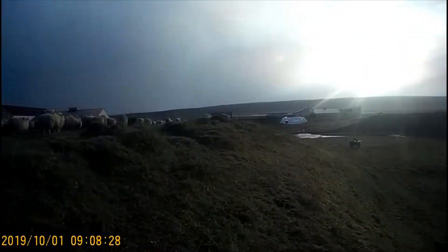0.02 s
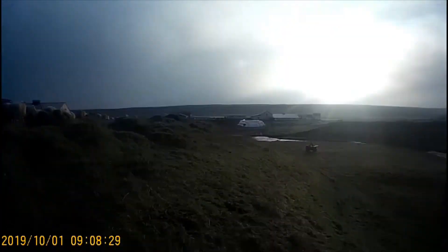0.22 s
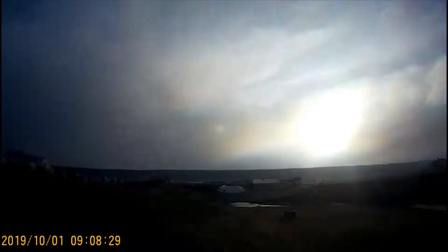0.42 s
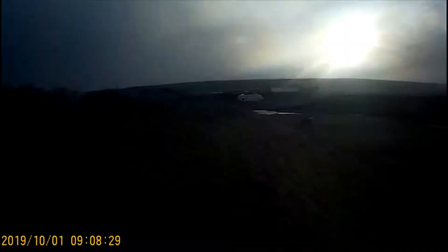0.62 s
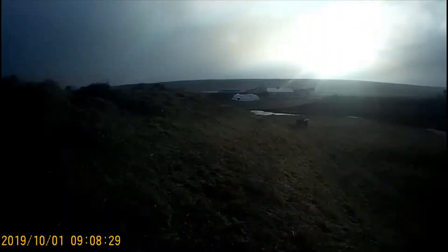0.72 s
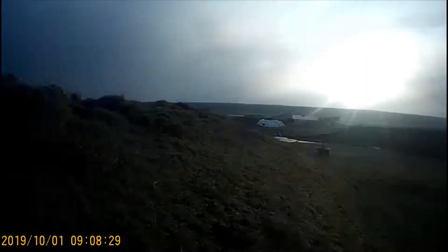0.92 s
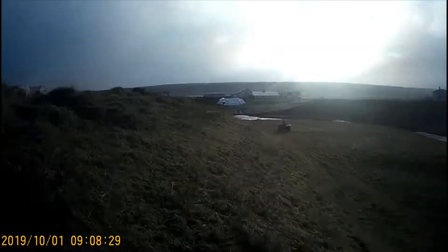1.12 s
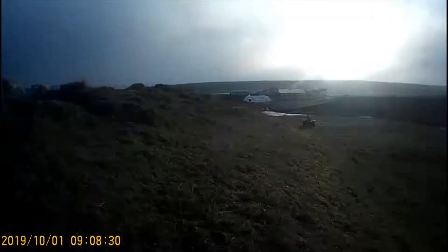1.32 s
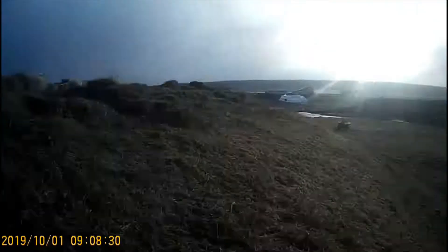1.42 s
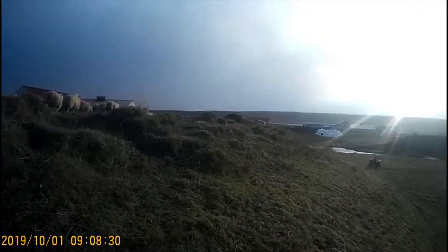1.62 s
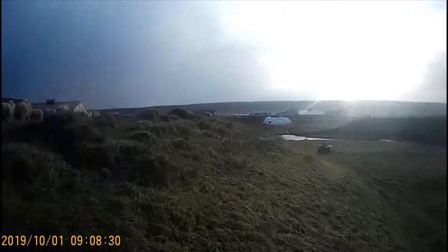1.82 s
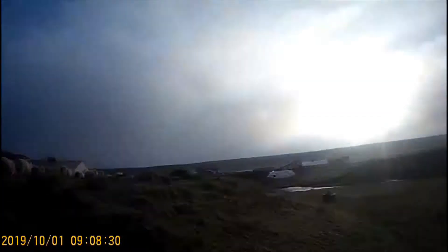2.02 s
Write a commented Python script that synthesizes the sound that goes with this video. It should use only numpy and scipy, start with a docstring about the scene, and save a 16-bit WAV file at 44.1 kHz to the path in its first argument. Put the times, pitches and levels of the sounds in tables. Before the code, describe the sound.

Brisk footsteps crunch through rough grass on open ground, five uneven footfalls with dull thuds, legs swishing between them, a boxy body-worn camera knocking on its mount and wind buffeting its microphone in low surges.

```python
"""Brisk footsteps through rough grass, heard from a small camera carried on the body.
Each footfall is a burst of tiny stalk fractures, with a low rub and a thud just after it.
Between footfalls the legs swish through the grass, a few stalks snap and the camera knocks on its mount.
The boxy camera case colours the grass; wind buffets the port as a surging rumble over a faint hiss."""
import sys
import numpy as np
from scipy import signal
from scipy.fft import rfft, irfft
from scipy.io import wavfile
from scipy.ndimage import uniform_filter1d

SR = 44100
rng = np.random.default_rng(int(sys.argv[2]) if len(sys.argv) > 2 else 0)


def wrap_up_sound(samples):
    """Save the sound to the file named by the first command line argument, as 16-bit audio."""
    columns = np.atleast_2d(samples).T
    # keep every value between -1 and 1, then stretch to whole-number steps
    tamed = np.clip(columns, -1, 1)
    steps = np.round(tamed * 32767).astype(np.int16)
    wavfile.write(sys.argv[1], SR, steps)


N = 92610
TIME = np.arange(N) / SR  # seconds

# Starting balance of the grass against its middle band; the tables add to these.
LOW_DB, TREBLE_DB = -4.5, -16


def from_db(db):
    """Turn decibels into gain."""
    return 10 ** (np.asarray(db) / 20)


def rms_one(x):
    """Scale to an rms (average strength) of 1."""
    return x / np.sqrt(np.mean(x ** 2) + 1e-20)


def coloured(x, spectrum):
    """Filter to the given spectrum, each sound starting at once (minimum phase); rms 1."""
    hz, db = np.transpose(spectrum)
    grid = np.maximum(np.arange(N + 1) * SR / (2 * N), 1)
    gain = from_db(np.interp(np.log(grid), np.log(hz), db))
    # Folding the cepstrum forward in time gives the minimum phase.
    cepstrum = irfft(np.log(gain))
    cepstrum[1:N] *= 2
    cepstrum[N + 1:] = 0
    response = np.exp(rfft(cepstrum))
    # The input is repeated to fill the filter's length of 2 N.
    filtered = irfft(rfft(np.tile(x, 2)) * response)
    return rms_one(filtered[:N])


def evened(x, window_s):
    """Take the slow swings out of a noise, leaving its fine grain; rms 1."""
    instant_power = np.abs(signal.hilbert(x)) ** 2
    power = uniform_filter1d(instant_power, max(int(window_s * SR), 1))
    return rms_one(x / np.sqrt(power + 1e-6))


def noise(spectrum):
    """Steady random noise of the given colour; rms 1."""
    return coloured(rng.standard_normal(N), spectrum)


def swell(start, end, rise, fall):
    """Rise, hold at 1 and fall; rise and fall are the seconds taken to change by 20 dB."""
    before = np.maximum(start - TIME, 0)
    after = np.maximum(TIME - end, 0)
    return from_db(-20 * (before / rise + after / fall))


def level_curve(points):
    """Gain over time, drawn in straight lines of decibels between the points."""
    return from_db(np.interp(TIME, *np.transpose(points)))


# Colour of the hiss: pitch_hz [Hz], level_db [dB per Hz]
HISS_COLOUR = [(100, 0.32), (4000, -1.5), (7000, -0.78), (15000, -0.65)]


def hiss():
    """The microphone's own faint, steady noise."""
    hiss_db = -68.5
    return from_db(hiss_db) * noise(HISS_COLOUR)


# Colour of the wind: pitch_hz [Hz], level_db [dB per Hz]
WIND_COLOUR = [(8, 1.5), (18, 11.5), (30, -1), (48, -8.5), (65, -20), (85, -13), (130, -17), (200, -20.5),
               (400, -45), (1000, -81), (4000, -110)]
# Wind buffeting the port: peak_s [s], rise_s [s per 20 dB], fall_s [s per 20 dB], level_db [dB]
WIND_GUSTS = [(.28, 0.07, 0.14, -22), (.42, 0.24, .16, -24.5), (.68, 0.049, 0.047, -11),
              (.755, 0.14, 0.11, -10), (0.991, 0.07, 0.1, -12.5), (1.055, 0.05, 0.058, -15),
              (1.376, 0.034, 0.017, -14), (1.451, 0.054, 0.055, -14.5), (1.772, 0.042, 0.081, -16),
              (1.83, 0.051, 0.047, -17)]


def wind():
    """Lumpy low rumble of air at the port, surging with the strides over a steady breeze."""
    breeze_db = -36
    power = from_db(breeze_db) ** 2
    for peak_s, rise_s, fall_s, level_db in WIND_GUSTS:
        gust = from_db(level_db) * swell(peak_s, peak_s, rise_s, fall_s)
        power = power + gust ** 2
    return np.sqrt(power) * evened(noise(WIND_COLOUR), window_s=0.032)


# Colour of a snapping stalk: pitch_hz [Hz], level_db [dB per Hz]
SNAP_COLOUR = [(1500, -17.5), (4500, -2.5), (7000, -13), (15000, -14)]
# Dry stalks snapping: peak_s [s], level_db [dB]
STALK_SNAPS = [(0.427, -46.5), (0.541, -53), (1.829, -56.5)]


def snaps():
    """Single dry stalks break, each a thin tick of bright noise."""
    rise_s, fall_s = 0.002, 0.02  # per 20 dB
    level = np.zeros(N)
    for peak_s, level_db in STALK_SNAPS:
        level += from_db(level_db) * swell(peak_s, peak_s, rise_s, fall_s)
    return level * noise(SNAP_COLOUR)


# Grass as heard through the case, in three bands: pitch_hz [Hz], level_db [dB per Hz]
GRASS_LOW_COLOUR = [(90, -24), (135, 5), (185, -1.5), (235, -6.5), (292, 9.5), (330, 1), (365, 2.5),
                    (420, -7.5), (485, -5), (560, -7), (640, -8.5), (755, -1.5), (870, -12.5), (1100, -14),
                    (4000, -80)]
GRASS_MIDDLE_COLOUR = [(400, -33), (880, -18.5), (995, -13.5), (1065, -8.5), (1160, 3), (1245, 4),
                       (1340, 1.5), (1480, -4), (1800, -4), (2020, -5), (2250, -19), (2600, -35.5),
                       (4000, -85), (8000, -80.5)]
GRASS_TREBLE_COLOUR = [(1700, -2), (2400, -7), (2800, 1.5), (3600, 2), (3900, -5), (4150, -13),
                       (5400, -23.5), (5950, -16.5), (6600, -33), (8200, -27), (15000, -43)]


def stalks(per_s, spread_db, window_s):
    """Tiny fractures of uneven size, as the low, middle and treble sound they raise in the case."""
    sizes = from_db(spread_db * np.minimum(rng.exponential(1, N), 4))
    signs = rng.choice([-1, 1], N)
    clicks = sizes * signs * (rng.random(N) < per_s / SR)
    bands = (GRASS_LOW_COLOUR, GRASS_MIDDLE_COLOUR, GRASS_TREBLE_COLOUR)
    return [evened(coloured(clicks, band), window_s) for band in bands]


# The camera knocking on its mount: start_s [s], boom_db [dB before the contact softens it],
# rattle_db [dB], boom_hz [Hz]
CAMERA_KNOCKS = [(.212, -22, -44, 131), (0.257, -14.5, -46, 126), (0.401, -12.5, -49, 125),
                 (0.676, -13, -38.5, 132), (.737, -13, -33.5, 131.5), (1.042, -14, -42, 140.4),
                 (1.126, -21.5, -52, 130), (1.37, -4, -51, 89.6), (1.445, -22, -56, 135),
                 (1.81, -15, -60, 136.5), (2.069, -29, -70, 147)]


def knocks():
    """A soft contact sets the mount booming as a fading tone, with a short noisy rattle of the case."""
    contact_s, boom_t60_s = 0.0025, 0.12  # T60 is the time to fade by 60 dB
    rattle_fall_s = 0.038  # per 20 dB
    booms, rattle_level = np.zeros(N), np.zeros(N)
    for start_s, boom_db, rattle_db, boom_hz in CAMERA_KNOCKS:
        age = np.maximum(TIME - start_s, 0)
        fading = from_db(boom_db - 60 * age / boom_t60_s)
        booms += fading * np.sin(2 * np.pi * boom_hz * age)
        rattle_level += from_db(rattle_db) * swell(start_s, start_s + contact_s, contact_s, rattle_fall_s)
    # Smearing the booms over the contact time softens their start.
    contact = np.hanning(max(int(contact_s * SR), 3))
    soft_booms = signal.fftconvolve(booms, contact / contact.sum())[:N]
    rattle = evened(noise(GRASS_MIDDLE_COLOUR), window_s=0.031)
    return soft_booms + rattle_level * rattle


# Colour of thuds and of the mount shaking: pitch_hz [Hz], level_db [dB per Hz]
THUD_COLOUR = [(30, -24), (85, -3.5), (108, -8), (137, 7.5), (170, -10), (225, -23.5), (292, -13.5),
               (420, -20), (750, -28), (1000, -46), (4000, -94.5)]


def thud_noise(window_s):
    """Low, even noise with the resonances of a jolted camera."""
    return evened(noise(THUD_COLOUR), window_s)


# Fine sizzle of blade tips, its colour: pitch_hz [Hz], level_db [dB per Hz]
SIZZLE_COLOUR = [(2500, -22), (4400, -4), (5300, -14), (6000, -9), (6800, -14.5), (10000, -14.5),
                 (15000, -17)]
# Sizzle over time: time_s [s], level_db [dB before the flutter]
SIZZLE_OVER_TIME = [(.22, -71), (.39, -60.5), (.54, -63.5), (.60, -71.5), (.68, -67), (.77, -70),
                    (.99, -64.5), (1.09, -62.5), (1.16, -60), (1.33, -67.5), (1.45, -65), (1.66, -68),
                    (1.93, -68), (2.0, -69.5)]


def sizzle():
    """Blade tips hiss finely, as bright noise that follows a level curve."""
    return level_curve(SIZZLE_OVER_TIME) * noise(SIZZLE_COLOUR)


# A leg sweeping through the grass: start_s [s], end_s [s], rise_s [s per 20 dB],
# fall_s [s per 20 dB], level_db [dB before the flutter], treble_db [dB added to TREBLE_DB],
# low_rub_db [dB added to LOW_DB], shake_db [dB against level_db]
LEG_SWISHES = [(.01, 0.063, 0.056, 0.14, -36, 2, -0.5, -18), (0.382, 0.488, 0.079, .02, -31, 7.5, 5, -3.5),
               (0.87, 0.919, 0.067, 0.036, -31.5, 3.5, 4.5, -4),
               (1.135, 1.206, 0.033, 0.089, -36.5, 7.5, 1, 2),
               (1.533, 1.589, 0.06, 0.05, -29, 2.5, 0, -5.5),
               (1.718, 1.767, 0.021, 0.024, -52.5, 11.5, 10, 6), (1.893, 1.961, 0.057, 0.026, -44, 6, 5, 8)]
# Stalks stirring between the strides: time_s [s], level_db [dB before the flutter]
STIR_OVER_TIME = [(0, -40.5), (.14, -56.5), (.185, -68), (.212, -37.5), (.33, -43), (.52, -46.5),
                  (.62, -54), (.76, -44), (1.1, -41.5), (1.325, -47.5), (1.45, -39), (1.6, -40),
                  (1.66, -57), (1.71, -44.5), (1.82, -45), (2.0, -59), (2.025, -51.5), (2.1, -51)]


def swishes():
    """Blades brush the swinging leg tuft by tuft and stir between strides; the swing shakes the mount."""
    window_s = 0.022
    layers = stalks(per_s=6000, spread_db=0.5, window_s=window_s) + [thud_noise(window_s)]

    def layer_power(level, treble_db, low_rub_db, shake_db):
        """Power of the low, middle, treble and shake layers over time."""
        mix = from_db([LOW_DB + low_rub_db, 0, TREBLE_DB + treble_db, shake_db])
        return (mix[:, None] * level) ** 2

    power = layer_power(level_curve(STIR_OVER_TIME), treble_db=1.5, low_rub_db=6, shake_db=7)
    for start_s, end_s, rise_s, fall_s, level_db, treble_db, low_rub_db, shake_db in LEG_SWISHES:
        level = from_db(level_db) * swell(start_s, end_s, rise_s, fall_s)
        power += layer_power(level, treble_db, low_rub_db, shake_db)
    brushing = (np.sqrt(power) * layers).sum(axis=0)

    # The level flutters from tuft to tuft: random points joined by straight lines.
    tufts_per_s, tuft_spread_db = 84, 2
    tuft_wander = np.interp(TIME * tufts_per_s, np.arange(N), rng.standard_normal(N))
    return from_db(tuft_spread_db * tuft_wander) * (brushing + sizzle())


# Footfalls: peak_s [s, crunch at its loudest], rise_s [s per 20 dB], fall_s [s per 20 dB],
# crunch_db [dB], treble_db [dB added to TREBLE_DB, against the crunch], thud_db [dB],
# low_rub_db [dB added to LOW_DB, against the crunch]
FOOTFALLS = [(0.267, 0.064, 0.045, -27, 2.5, -20.5, 0.5), (0.694, 0.041, 0.026, -20, 3, -10, 2),
             (0.999, 0.053, 0.047, -28.5, 1.5, -26, 5), (1.393, 0.023, 0.021, -14.5, -5.5, -17.5, -0.5),
             (1.766, 0.041, 0.01, -33, 3.5, -26.5, 11.5)]


def footfalls():
    """The sole crushes a burst of stalks; a moment later the weight comes down with a rub and a thud."""
    weight_lag_s = 0.0063
    low, middle, treble = stalks(per_s=5300, spread_db=5.5, window_s=0.034)
    thud = thud_noise(window_s=0.012)
    out = np.zeros(N)
    for peak_s, rise_s, fall_s, crunch_db, treble_db, thud_db, low_rub_db in FOOTFALLS:
        crunch = middle + from_db(TREBLE_DB + treble_db) * treble
        out += swell(peak_s, peak_s, rise_s, fall_s) * from_db(crunch_db) * crunch
        weight_s = peak_s + weight_lag_s
        rub = from_db(crunch_db + LOW_DB + low_rub_db) * low
        weight = rub + from_db(thud_db) * thud
        out += swell(weight_s, weight_s, rise_s, fall_s) * weight
    return out


def scene():
    """Add hiss, wind, camera, grass and feet into one channel."""
    background = hiss() + wind()
    details = snaps() + knocks()
    walking = swishes() + footfalls()
    return (background + details + walking)[None]


def record(dry):
    """The recorder cuts the top with a steep low-pass filter."""
    cutoff_hz, ripple_db, stop_db = 15200, 0.1, 80
    low_pass = signal.ellip(10, ripple_db, stop_db, cutoff_hz, fs=SR, output="sos")
    return signal.sosfilt(low_pass, dry)


dry = scene()
out = record(dry)
wrap_up_sound(out)
```